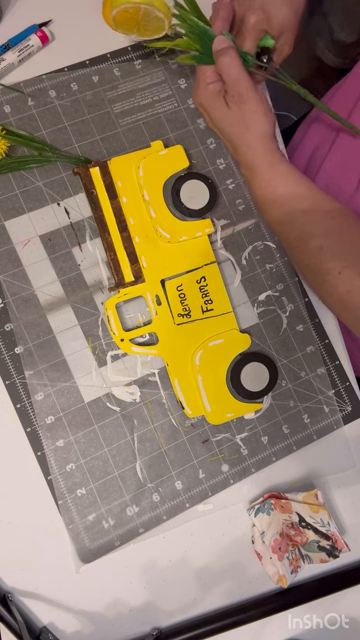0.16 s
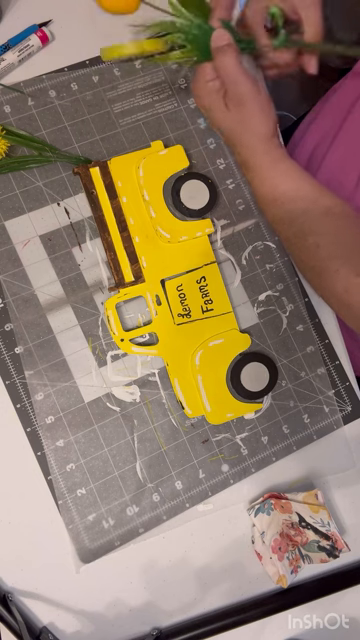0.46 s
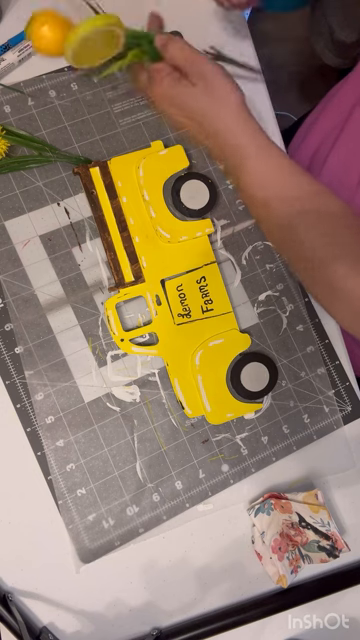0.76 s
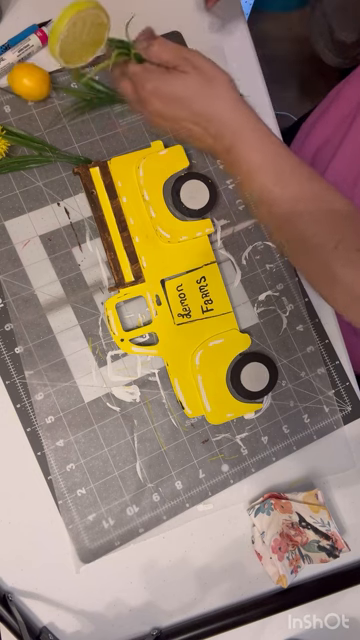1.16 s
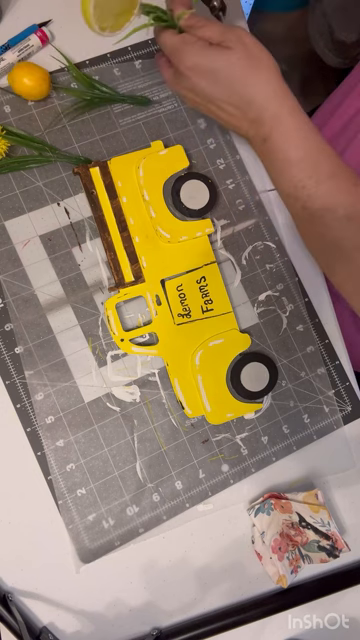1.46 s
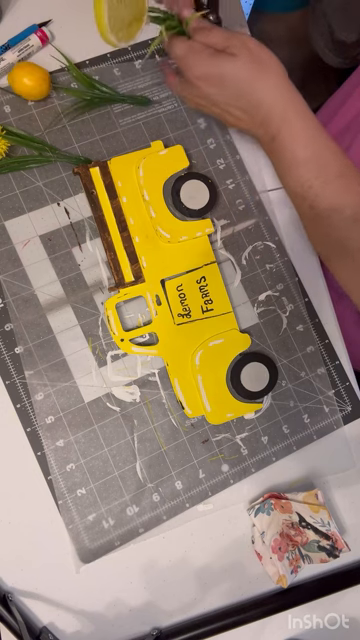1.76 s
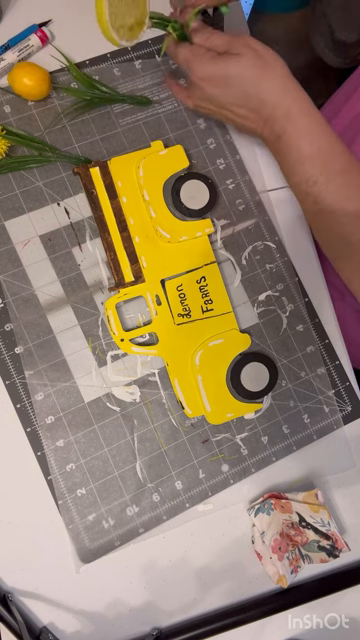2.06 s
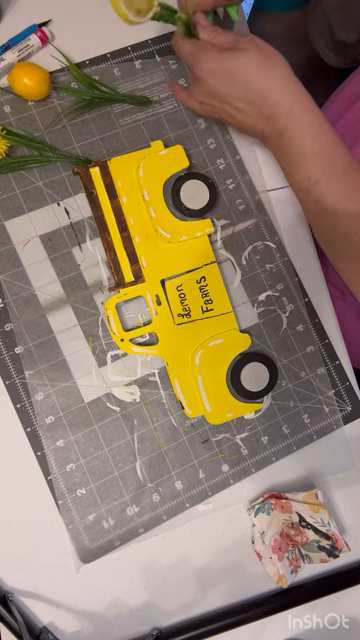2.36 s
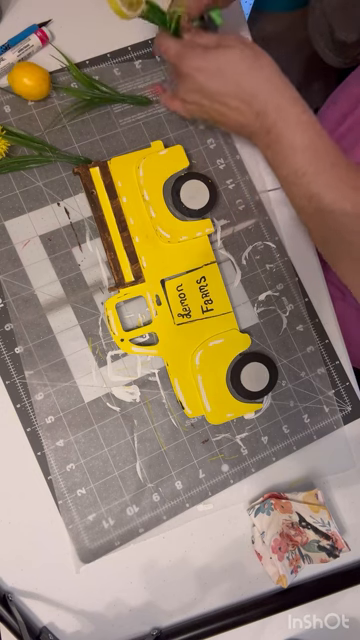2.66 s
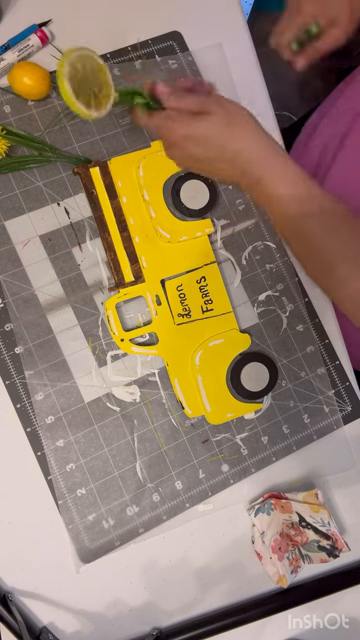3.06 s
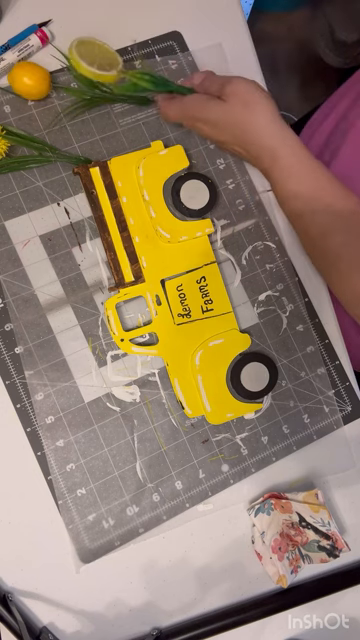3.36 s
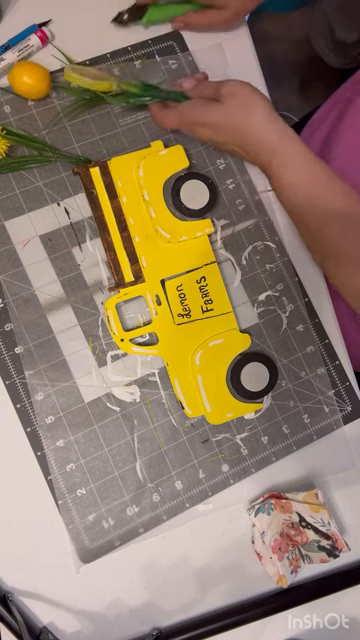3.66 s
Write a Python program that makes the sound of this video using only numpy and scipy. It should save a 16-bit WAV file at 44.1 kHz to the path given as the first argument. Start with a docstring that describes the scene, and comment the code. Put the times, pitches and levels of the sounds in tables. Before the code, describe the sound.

Wire cutters snap once through a wire stem with a bright clank and bouncing offcut; before it a plastic sprig rustles and drops, afterwards the cutters clatter onto the table. Small room, low hum, close phone microphone.

```python
"""Wire cutters snap through a stem at a table in a small room; they squeak, ring, and are choked by the grip.
The offcut bounces; later the cutters go down with a thud, a scrape and a clack. Before the cut a plastic
sprig rustles and drops on the mat. Contacts are shaped noise bursts, rings are decaying modes, and rustle
and scrape are random clicks. Behind them are a small-room echo and filtered noise for room air and low hum.
The stereo is narrow in the bass and very wide, nearly opposite in phase, in the treble."""
import sys
import numpy as np
from scipy import signal
from scipy.fft import rfft, irfft
from scipy.io import wavfile
from scipy.ndimage import uniform_filter1d

SR = 44100
rng = np.random.default_rng(int(sys.argv[2]) if len(sys.argv) > 2 else 0)


def materialize(psi):
    """Save the field psi as 16-bit PCM at rate SR to the path in sys.argv[1].

    A 1-D psi becomes a single channel; in a 2-D psi each row is a channel.
    """
    bounded = np.clip(np.atleast_2d(psi).T, -1, 1)
    quanta = np.round(bounded * 32767).astype(np.int16)
    wavfile.write(sys.argv[1], SR, quanta)


N = 167580
T = np.arange(N) / SR
SIZE = 2 ** 19  # transform length in samples, longer than the scene
HZ = np.maximum(np.arange(SIZE // 2 + 1) * SR / SIZE, 1)

# cutters snap through the wire [t/s, level/dB, contact length/s]
SNIPS = [(2.57, 9.5, .004)]
# the offcut lands and bounces [t/s, level/dB, contact length/s, tilt/dB per octave, ring/dB]
OFFCUT = [(2.637, 3, .0035, 0, -41), (2.6424, -2, .005, -2, -38.5), (2.652, -5.5, .006, -4, -42),
          (2.666, -11, .008, -3.5, -44.5)]
# the cutters' handles meet the table [t/s, level/dB, contact length/s, tilt/dB per octave, thud/dB]
HANDLES = [(3.657, -27, 0.009, 1, -70), (3.708, -8.5, 0.0055, 0, -16.5), (3.7278, -14, 0.0047, -3.5, -28.5),
           (3.7668, -10.5, 0.0058, -5, -23.5), (3.7770, -20, .008, -5.5, -34)]
# colour of handles against table [f/Hz, level/dB]
HANDLE_COLOUR = [(150, -12), (390, 17.5), (1000, 3), (1600, 9), (2100, -0.5), (2700, 9), (3800, -6),
                 (5200, -7.5), (8400, -10.5), (11400, -29), (15000, -22)]
# the sprig drops [t/s, level/dB, contact length/s, tilt/dB per octave, thud/dB]
SPRIG = [(0.9689, -1, 0.0039, 0, -27), (1.0265, -9, 0.0085, 3, -32), (1.033, -9.5, .004, -1, -57.5),
         (1.05, -16, 0.0044, 3.5, -63)]
# stereo width and lean by frequency [f/Hz, direct side over mid/dB, diffuse side over mid/dB, left over right/dB]
STEREO = [(60, -27.5, -29.5, 0), (121, -28.5, -31, -0.5), (250, -21.5, -14, -3.5), (540, -9.5, 0, -1),
          (1062, -6, -3.5, 4.5), (2200, 8, 6.5, 5.5), (3860, -6.5, 2, 0.5), (6050, 14, 12.5, 4),
          (7300, 15, 29.5, -0.5), (8650, 24, 42, -0.5), (12500, 13, 35.5, 2), (14370, 7, 11, 0.5)]


def amp(db):
    """Decibels to gain."""
    return 10 ** (np.asarray(db) / 20)


def curve(points, hz, axis=1):
    """Read a column of a table on a log-frequency axis."""
    p = np.array(points, float)
    return np.interp(np.log(hz), np.log(p[:, 0]), p[:, axis])


def filtered(x, response):
    """Apply a frequency response."""
    return irfft(rfft(x, SIZE) * response)[..., :N]


def coloured(x, points, size=4096):
    """Minimum-phase filter with the given colour, so that nothing sounds ahead of its contact."""
    hz = np.maximum(np.arange(size // 2 + 1) * SR / size, 1)
    cepstrum = irfft(np.log(amp(curve(points, hz))))
    # fold the cepstrum onto positive time
    cepstrum[1:size // 2] *= 2
    cepstrum[size // 2 + 1:] = 0
    impulse = irfft(np.exp(rfft(cepstrum)))
    return signal.fftconvolve(x, impulse[None], axes=1)[:, :N]


def add(out, start, sound):
    """Mix a sound in at a time."""
    i = int(np.clip(start * SR, 0, N - 1))
    out[:, i:i + sound.shape[1]] += sound[:, :N - i]


def cracks(rows, colour, size=1024, count=6):
    """Each contact is a few milliseconds of dense noise; a positive tilt favours the treble."""
    out, t = np.zeros((2, N)), np.arange(size) / SR
    # tilt pivots at 2 kHz and is level below 500 Hz
    octaves = np.log2(np.maximum(np.arange(size // 2 + 1) * SR / size, 500) / 2000)
    for start, db, length, *tilt in rows:
        shape = np.exp(-(t / length) ** 2)
        burst = rng.standard_normal((2, size)) * shape
        # alternate an even spectrum with the time envelope until the burst nearly has both
        for _ in range(count):
            even = irfft(np.exp(1j * np.angle(rfft(burst))))
            burst = even * np.sqrt(shape)
        burst = burst / np.sqrt(np.sum(burst ** 2, axis=1, keepdims=True))
        if tilt:
            burst = irfft(rfft(burst) * amp(tilt[0] * octaves))[:, :size // 2]
        add(out, start, amp(db) * burst)
    return coloured(out, colour)


def rings(hits, modes, push=0.00029, rough=0):
    """Blows (s, dB, optional pitch ratio) excite decaying modes; push (s) softens the attack, rough wobbles."""
    out, t = np.zeros((2, N)), T[:SR // 2]
    steps = np.arange(512) * 0.0055  # s, one random wobble value per step
    for start, db, *ratio in hits:
        ring, pitch = 0, ratio[0] if ratio else 1
        for hz, mode_db, t60 in modes:
            wobble = 0
            if rough:
                drift = rng.standard_normal(len(steps)) + 1j * rng.standard_normal(len(steps))
                wobble = np.interp(t, steps, drift)
            mode = np.exp((2j * np.pi * hz * pitch - np.log(1000) / t60) * t)
            ring = ring + amp(db + mode_db) * (1 + rough * wobble) * mode
        attack = 1 - np.exp(-t / push)
        add(out, start, np.array([ring.imag, ring.real]) * attack)
    return out


def grains(swells, rate):
    """Tiny random clicks, rate per second, that come and go in (middle s, half length s, dB) swells."""
    spread_db = 5.5
    swell = sum(amp(db) * np.exp(-((T - middle) / half) ** 2) for middle, half, db in swells)
    happens = rng.random(N) < rate / SR
    clicks = happens * rng.standard_normal((2, N)) * amp(spread_db * rng.standard_normal(N))
    return clicks / clicks.std() * swell


def snap():
    """The stem gives way between the cutters in a short, broad burst."""
    # colour of the snap [f/Hz, level/dB]
    snap_colour = [(100, -17.5), (280, -7), (520, 3), (780, -10.5), (1050, -2.5), (1350, -7), (1700, -1.5),
                   (2300, 3.5), (2900, -5), (3500, 1), (4300, -12), (5500, 2.5), (7500, -4.5),
                   (11400, -2.5), (15000, 0.5)]
    return cracks(SNIPS, snap_colour)


def squeak():
    """Steel edges squeak on the wire around the snap: sines under one jittering pitch."""
    # squeak of the biting blades [f/Hz, level/dB]
    partials = [(2100, -1), (2350, -5), (4700, -20), (7050, -23)]
    level_db, lead_s, half_s = -34, 0.0064, .006
    jitter, smooth = 0.067, 30  # rms share of the pitch, samples
    wander = np.sqrt(smooth) * uniform_filter1d(rng.standard_normal((2, N)), size=smooth)
    turns = np.cumsum(1 + jitter * wander, axis=1) / SR
    swell = sum(np.exp(-((T - row[0] + lead_s) / half_s) ** 2) for row in SNIPS)
    return swell * sum(amp(level_db + db) * np.sin(2 * np.pi * hz * turns) for hz, db in partials)


def clank():
    """The cutters ring roughly; the closing grip chokes the low modes and knocks the blades together."""
    # ring of the cutters [f/Hz, level/dB, t60/s]
    modes = [(1060, -1, .2), (1134, -11, .14), (1630, -13, .18), (2024, -7, .16), (2130, -8, .15),
             (2191, -6, .2), (2266, -8, .17), (2380, -8, .18), (2497, -8, .2), (2546, -5, .14),
             (3650, -13, .06), (5248, -11, .18), (5560, -16, .12)]
    ring_db, rough = -22.5, 0.34
    grip_after_s, choke_db, knock_db, choke_below_hz = .034, -7, -34.5, 1500
    low = [m for m in modes if m[0] < choke_below_hz]
    high = [m for m in modes if m[0] >= choke_below_hz]
    out = 0
    for start, *_ in SNIPS:
        closed = start + grip_after_s
        closing = np.clip((T - closed) / 0.0053 + .5, 0, 1)  # a 5.3 ms ramp
        out = out + amp(choke_db * closing) * rings([(start, ring_db)], low, push=0.0018, rough=rough / 2)
        out = out + rings([(start, ring_db), (closed, knock_db)], high, push=0.0039, rough=rough)
    return out


def offcut_bounces():
    """The offcut hits in a quick run of short contacts."""
    # colour of the offcut's contacts [f/Hz, level/dB]
    offcut_colour = [(100, -27.5), (330, -0.5), (520, 6), (950, -7), (1570, 5.5), (2500, 0.5), (3050, 2.5),
                     (4200, -14), (6000, -3), (8400, -31), (11400, -36.5), (15000, -30)]
    return cracks(OFFCUT, offcut_colour)


def offcut_ring():
    """Each bounce sets the offcut's own modes ringing."""
    # ring of the offcut [f/Hz, level/dB, t60/s]
    modes = [(328, 2, .2), (431, 1.5, .1), (1513, -4, .18), (1906, -2, .17), (2175, -2, .2), (2498, -4, .2),
             (2917, -6, .12)]
    return rings([(row[0], row[-1]) for row in OFFCUT], modes, push=0.0013, rough=0.19)


def jaws():
    """The steel jaws clack down after the handles."""
    # jaw contact [t/s, level/dB, contact length/s]
    clacks = [(3.7940, 18, 0.0038)]
    # colour of the clack [f/Hz, level/dB]
    jaw_colour = [(100, -22.5), (560, -3), (1000, -10), (1550, 3.5), (2300, -11.5), (3100, -4), (5600, -27),
                  (6600, -17), (8400, -24), (15000, -28.5)]
    return cracks(clacks, jaw_colour)


def handle_ring():
    """The handles ring on after each touch of the table."""
    # ring of the handles [f/Hz, level/dB, t60/s]
    modes = [(1103, 4.5, 0.147), (1546, 1, 0.29), (1653, -2, 0.13), (2700, 3, 0.15), (2790, 1.5, 0.1),
             (5200, -14, 0.08)]
    ring_db = -35  # against each contact's level
    return rings([(row[0], row[1] + ring_db) for row in HANDLES], modes, rough=.25)


def thuds(rows, modes):
    """A landing pushes the surface softly and a little late, so its low modes thud."""
    push_s, lag_s = 0.0037, 0.00307
    return rings([(row[0] + lag_s, row[-1]) for row in rows], modes, push_s)


def table_thuds():
    """The table top thuds under the handles."""
    # the table top [f/Hz, level/dB, t60/s]
    modes = [(153.7, -14.5, 0.37), (209.5, -6.5, 0.14), (306.5, -1, 0.099), (327.1, 1.5, 0.18),
             (365.4, -3.5, 0.17), (436.4, -5.5, 0.18), (531.5, -13.5, 0.27)]
    return thuds(HANDLES, modes)


def scrape():
    """The cutters drag, sticking and slipping on the table as a swell of clicks."""
    # drags as they settle [middle t/s, half length/s, level/dB]
    drags = [(3.69, 0.041, -58), (3.737, 0.021, -42), (3.786, 0.012, -43.5)]
    return coloured(grains(drags, rate=520), HANDLE_COLOUR)


def sprig_drop():
    """The plastic sprig lands in short contacts."""
    # colour of the sprig's contacts [f/Hz, level/dB]
    sprig_colour = [(100, -4.5), (400, 5.5), (1050, -5), (1400, -2), (1900, -5.5), (3500, -6),
                    (5000, -12.5), (8400, -12.5), (11400, -23), (15000, -11.5)]
    return cracks(SPRIG, sprig_colour)


def mat_thuds():
    """The cutting mat thuds under the sprig."""
    # the mat where the sprig lands [f/Hz, level/dB, t60/s]
    modes = [(150.7, -4, 0.14), (187, 0.5, 0.11), (294.5, 1, 0.077), (345, 4, 0.045), (453, -3.5, 0.088),
             (535, -13, 0.15)]
    return thuds(SPRIG, modes)


def stems():
    """The dropped sprig's stalks buzz, its stem knocks and its loose wire end pings, as short-lived modes."""
    # stalks [f/Hz, level/dB, t60/s]
    stalk_modes = [(1420, 0, .06), (2500, -2, .04), (3500, 0, .035)]
    # loose wire end pings [t/s, level/dB], and its modes [f/Hz, level/dB, t60/s]
    wire_ping = (1.0502, -36)
    wire_modes = [(3720, -3, .018), (3850, 0, .022)]
    # stem knocks as the sprig bounces [t/s, level/dB], and its modes [f/Hz, level/dB, t60/s]
    stem_knock = (1.0272, -38)
    stem_modes = [(1310, -7.5, 0.16), (1546, -0.5, 0.023), (1710, 7.5, 0.022), (1815, 3.5, 0.037)]
    stalk_db = -37  # against each contact's level
    stalks = rings([(row[0], row[1] + stalk_db) for row in SPRIG], stalk_modes)
    return stalks + rings([wire_ping], wire_modes) + rings([stem_knock], stem_modes)


def leaves():
    """Plastic leaves rustle in swells of tiny clicks, with a few clearer brushes in the hand."""
    # rustles [middle t/s, half length/s, level/dB]
    rustles = [(0.297, 0.028, -62.5), (0.385, 0.04, -62), (0.53, .04, -70.5), (0.808, 0.074, -64.5),
               (0.915, .04, -56.5), (0.963, 0.0073, -47.5), (1.065, 0.026, -59), (3.22, .2, -71.5)]
    # brushes of leaves and stems [t/s, level/dB, contact length/s]
    brushes = [(0.281, -29, .009), (0.396, -31, .004), (0.8665, -24.5, 0.0057), (0.906, -24, 0.011),
               (1.126, -33, 0.005), (3.583, -30, 0.0049)]
    # colour of the plastic [f/Hz, level/dB]
    leaf_colour = [(200, -15), (1100, 3), (1800, -1.5), (2650, -2), (3200, 0), (4000, 0.5), (5600, -14.5),
                   (8400, -7.5), (12000, -14.5), (15000, -6)]
    return coloured(grains(rustles, rate=1900), leaf_colour) + cracks(brushes, leaf_colour)


def chimes():
    """The cutters chime faintly and roughly as they shift in the hand."""
    # shifts in the hand [t/s, level/dB, pitch ratio]
    shifts = [(0.298, -49, 1.04), (0.385, -56, 1.02), (0.510, -55, 1), (3.583, -42.5, 1.06)]
    # chime at pitch ratio 1 [f/Hz, level/dB, t60/s]
    modes = [(1050, 0, .17), (1110, -4, .07)]
    return rings(shifts, modes, push=0.0047, rough=0.55)


def nudges():
    """The forearm nudges the table and its lowest modes answer softly."""
    # nudges [t/s, level/dB]
    bumps = [(1.124, -39.5), (3.062, -33.5), (3.090, -36), (3.288, -44)]
    # low modes of the table [f/Hz, level/dB, t60/s]
    modes = [(85, -6.5, 0.23), (152.5, 0, 0.17), (192, -3.5, 0.24)]
    return rings(bumps, modes, push=0.0056)


def room(x):
    """Diffuse echo of a small room: noise bands that each decay at their own rate, shortest in the treble."""
    # echo by band [f/Hz, level against direct/dB, t60/s]
    bands = [(150, -5, .33), (400, -3, .28), (1000, -2.5, .29), (2200, -.5, .31), (5500, -2, .3),
             (8500, -10, .18), (15000, -7.5, .17)]
    delay_s = 0.0012  # the echo fades in over the second half of this
    t = T[:SR // 2]
    hz = np.maximum(np.arange(len(t) // 2 + 1) * SR / len(t), 1)
    centres = np.log([row[0] for row in bands])
    noise, tail = rfft(rng.standard_normal((2, len(t)))), 0
    for share, (_, db, t60) in zip(np.eye(len(bands)), bands):
        band = irfft(noise * np.interp(np.log(hz), centres, share), len(t))
        rate = np.log(1000) / t60
        tail = tail + band * amp(db) * np.sqrt(2 * rate / SR) * np.exp(-rate * t)
    onset = np.clip(2 * t / delay_s - 1, 0, 1)
    return signal.fftconvolve(x, tail * onset, axes=1)[:, :N]


def hum():
    """Room air and an air handler's wavering low tones, as noise with narrow bumps in its spectrum."""
    # room air [f/Hz, level/dB per Hz]
    air = [(22, -97), (42, -76.5), (57, -69), (72, -80), (125, -74.5), (175, -74.5), (230, -76.5),
           (300, -82.5), (380, -87.5), (1050, -94), (1750, -99.5), (2300, -104.5), (3550, -112),
           (5600, -117), (8400, -127), (12800, -133), (14200, -126), (16000, -127)]
    # hum of the air handler [f/Hz, width/Hz, level/dB rms]
    tones = [(97.1, 13, -53), (160, 10, -60.5), (182, 17, -62), (290.8, 12, -64.5)]
    power = amp(curve(air, HZ)) ** 2
    for hz, width, db in tones:
        power = power + amp(db) ** 2 * np.exp(-np.pi * ((HZ - hz) / width) ** 2) / width
    return filtered(rng.standard_normal((2, N)), np.sqrt(power * SR / 2))


def spread(x, axis):
    """Use two streams as mid and side, with the width of one STEREO column and constant power."""
    width = amp(curve(STEREO, HZ, axis=axis))
    return filtered(x, np.array([np.ones_like(width), width]) / np.hypot(1, width))


def left_right(mid, side):
    """Mid and side become left and right, leaning by frequency; the bass comes first on the left."""
    lead_s, lead_below_hz = .00025, 260  # lead at the very bottom, fading upwards
    lean = amp(curve(STEREO, HZ, axis=3))
    lead = np.exp(2j * np.pi * HZ * lead_s * np.exp(-(HZ / lead_below_hz) ** 2))
    response = np.array([lean * lead, np.ones_like(lean)]) * np.sqrt(2) / np.hypot(1, lean)
    return filtered(np.array([mid + side, mid - side]), response)


def scene():
    """All sources, direct and echoed by the room, spread over left and right."""
    sharp = snap() + offcut_bounces() + cracks(HANDLES, HANDLE_COLOUR) + jaws() + scrape() + sprig_drop()
    ringing = clank() + offcut_ring() + handle_ring() + table_thuds() + mat_thuds() + chimes() + nudges()
    pings, rustle = stems(), leaves()
    ring_wet, stem_wet = 0.16, 0.39  # gains into the room
    echo = room(sharp + rustle + ring_wet * ringing + stem_wet * pings)
    direct = sharp + ringing + pings + squeak()
    diffuse = hum() + rustle + echo
    mid, side = spread(direct, axis=1) + spread(diffuse, axis=2)
    return left_right(mid, side)


def record(dry):
    """The phone cuts the top with a steep low-pass."""
    top_hz = 15900
    return signal.sosfilt(signal.ellip(10, .2, 70, top_hz, fs=SR, output="sos"), dry)


dry = scene()
out = record(dry)
materialize(out)
```